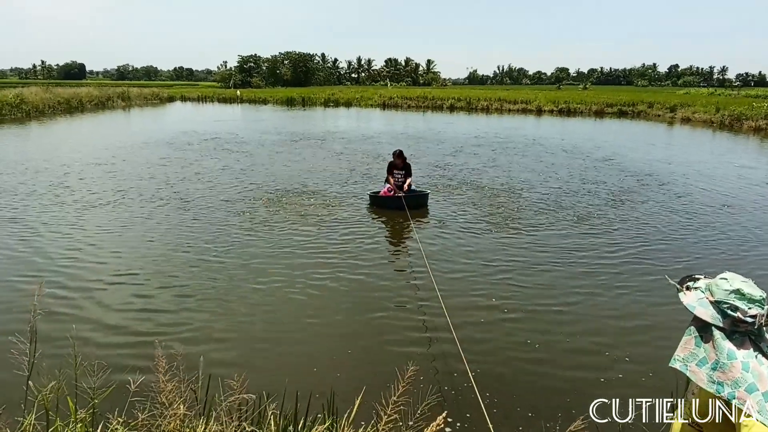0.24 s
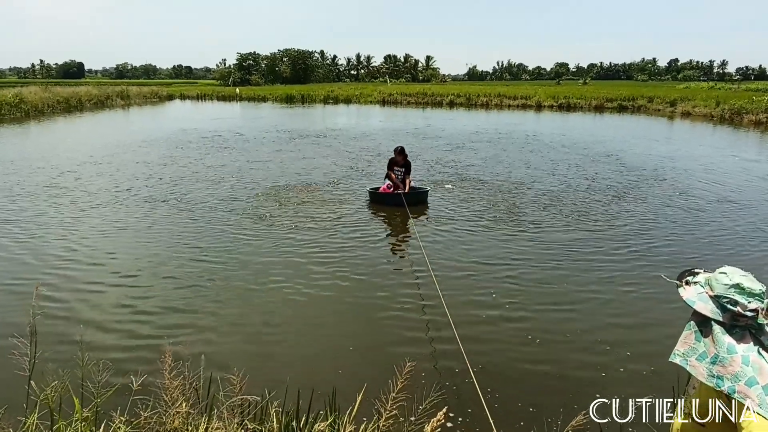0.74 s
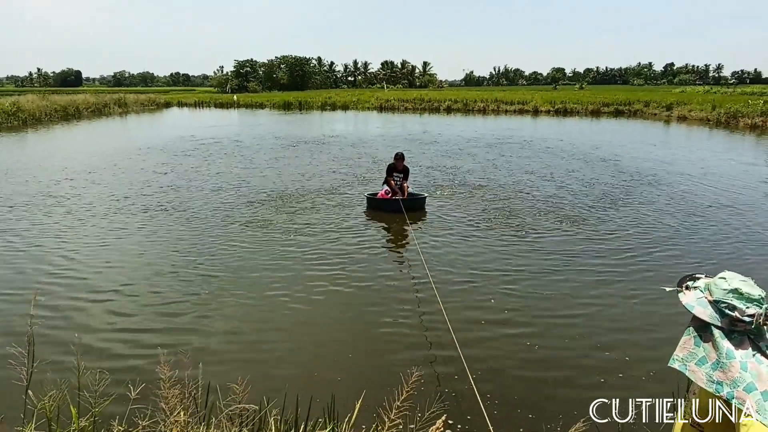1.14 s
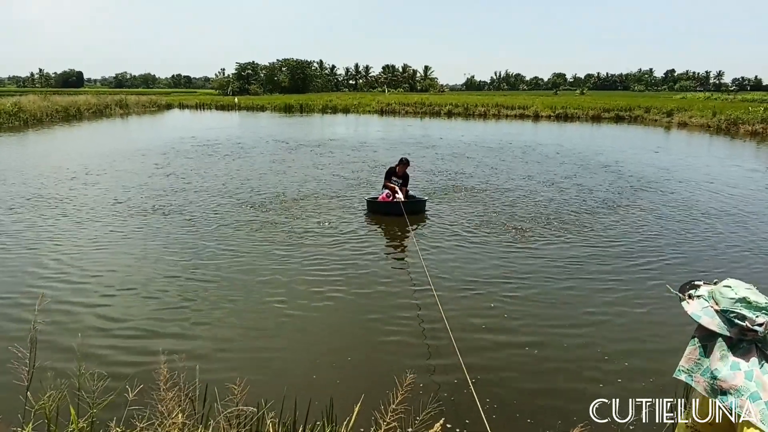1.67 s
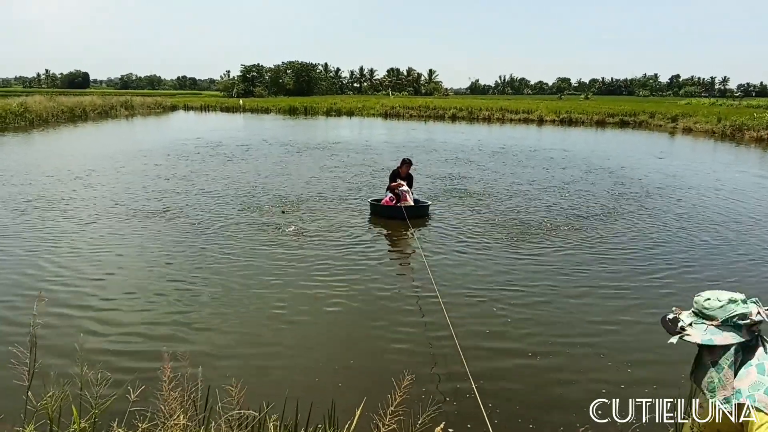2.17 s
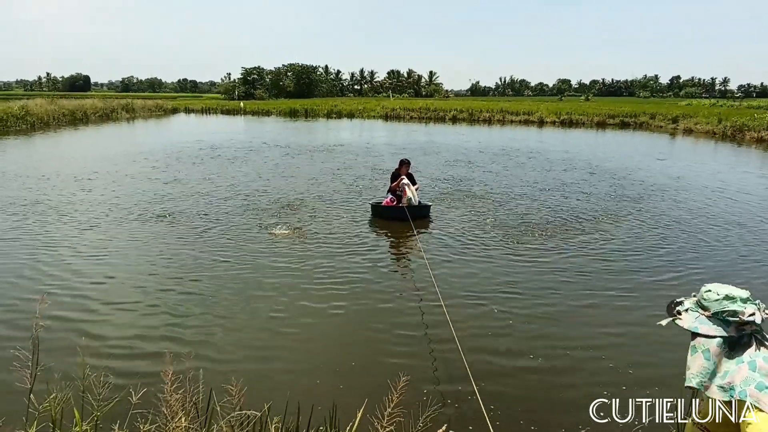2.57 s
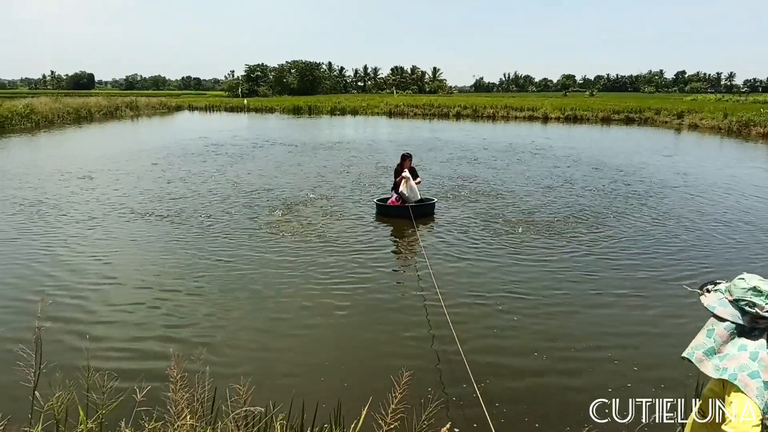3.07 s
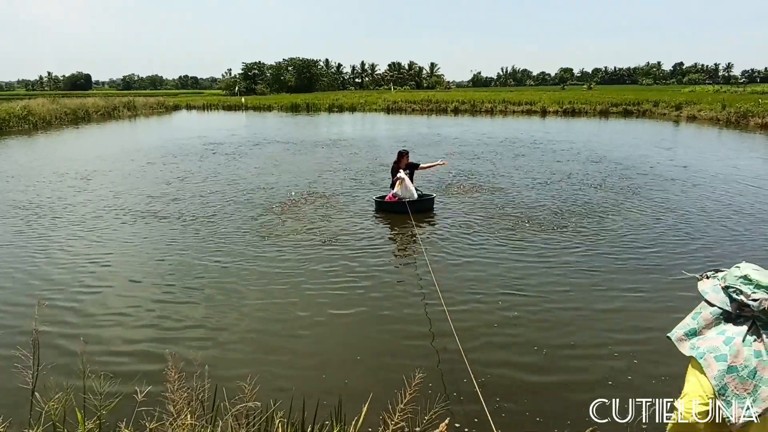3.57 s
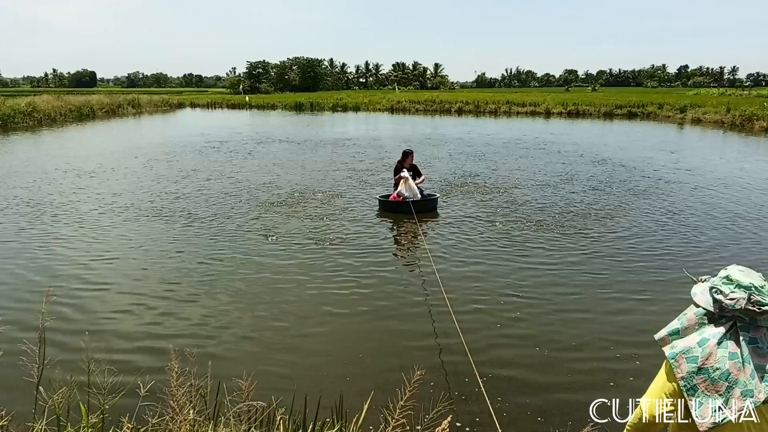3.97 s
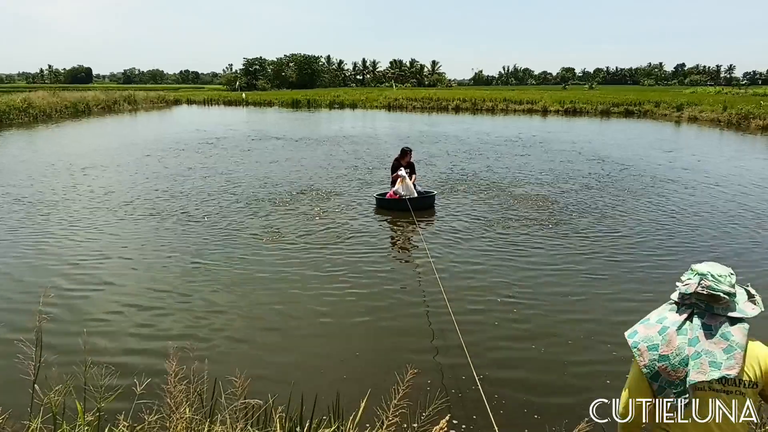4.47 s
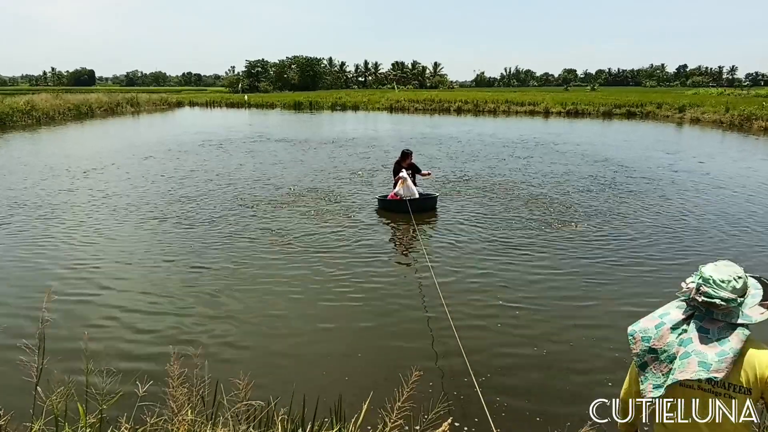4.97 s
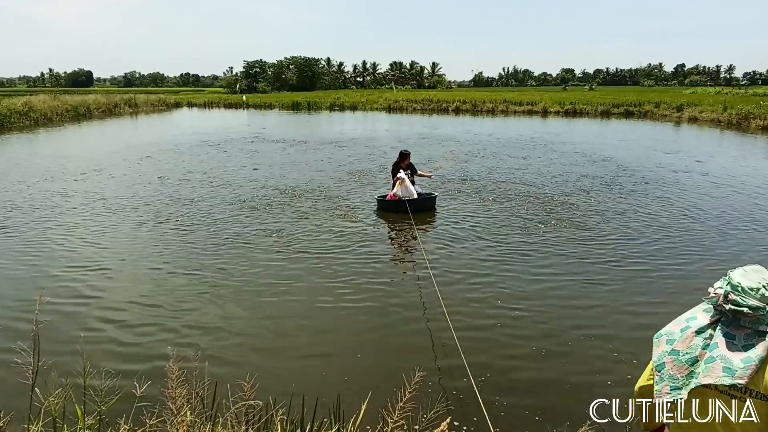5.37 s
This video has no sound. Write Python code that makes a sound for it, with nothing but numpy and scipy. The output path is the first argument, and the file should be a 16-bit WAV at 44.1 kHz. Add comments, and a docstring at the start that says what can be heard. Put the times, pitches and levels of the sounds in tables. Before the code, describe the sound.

Small bubbly plops, ticks and high drop pings scatter across an open pond over a low wash of lapping water. After a sparse first stretch, a single sharp click rings very briefly, close to the microphone. The water then grows livelier, with the strongest plop near two and a half seconds, before easing. Soft cloth- or grass-like hiss and low wind puffs stay faint, with only a slight scattered reflection.

```python
"""A wash of lapping and fine droplets, then plops at mid distance: fish stir a pond while they feed.
Plops are gliding notes of air pockets; ticks are showers of tiny damped sines and noise; lone drops ping.
The wash is coloured noise plus random damped sines. A soft hiss close by (cloth or grass, perhaps) is high noise;
light wind bumps the microphone as low noise, and one small hard object clicks: noise burst plus ringing modes."""
import sys
import numpy as np
from scipy import signal
from scipy.fft import rfft, irfft, next_fast_len
from scipy.io import wavfile
from scipy.ndimage import uniform_filter1d, map_coordinates

SR = 44100
rng = np.random.default_rng(int(sys.argv[2]) if len(sys.argv) > 2 else 0)


def unload_audio(sound):
    """Save the sound as a 16-bit wav file, at the path given as the first command line argument."""
    columns = np.transpose(np.atleast_2d(sound))
    # keep every value between -1 and 1, then stretch to whole-number steps
    steps = np.round(np.clip(columns, -1, 1) * 32767)
    wavfile.write(sys.argv[1], SR, steps.astype(np.int16))


N = 248283

# spectra of the wind, hiss and mist, lapping, spray: [f/Hz, relative density/dB]
WIND_SPECTRUM = [(25, -40), (50, -13), (80, -5.5), (120, -5), (180, -9), (260, -11.5), (400, -35),
                 (700, -120)]
HIGH_SPECTRUM = [(1500, -74), (5000, -6.5), (7000, -13.5), (10000, -15), (12000, -9.5), (13300, 0),
                 (14300, 1), (15400, -5), (17000, -9)]
LAPPING_SPECTRUM = [(71, -58), (120, -20), (355, -6.5), (456, -10), (668, 0.5), (896, -4.5), (1500, -3),
                    (2070, -17), (2360, -19.5), (4000, -25), (5200, -86), (8800, -120)]
SPRAY_SPECTRUM = [(300, -90), (1100, -2), (2000, 11.5), (3000, -1.5), (5000, -0.5), (6500, -1.5),
                  (8000, -10), (11000, -6), (16000, -4.5)]
# tone of the small-bubble grains: [f/Hz, relative gain/dB]
BURBLE_TONE = [(100, -46), (250, -10.5), (450, -8), (700, -4.5), (1600, -4), (2300, -13), (5000, -9.5)]
# wind puffs on the microphone port: [peak t/s, level/dB, rise/s, fall/s]
WIND_PUFFS = [(1.364, -55, 0.026, 0.012), (2.1, -61, 0.11, 0.1), (2.43, -62, 0.032, 0.07),
              (2.56, -61, 0.033, 0.012), (2.886, -51.5, 0.086, 0.021), (3.12, -63, 0.08, 0.035),
              (3.32, -55.5, 0.17, 0.041), (3.59, -61.5, 0.076, 0.054), (3.781, -62, 0.11, 0.037),
              (4.055, -50.5, 0.037, 0.097), (4.22, -63, 0.036, 0.059), (4.45, -53, 0.17, 0.4),
              (4.747, -50.5, 0.062, 0.065), (5.045, -48, 0.033, 0.043), (5.44, -56, 0.023, 0.026)]
# hiss: [t/s, level/dB]
HISS_LEVELS = [(0, -72), (0.21, -62.5), (0.41, -69.5), (0.59, -56.5), (0.69, -65), (1, -64), (1.22, -59),
               (1.77, -60), (2.12, -55), (2.24, -61), (2.4, -60.5), (2.77, -54.5), (2.85, -64), (3.0, -65),
               (3.04, -60), (3.11, -52), (3.18, -56), (3.61, -59.5), (3.7, -64.5), (3.95, -64.5),
               (4.26, -59), (4.35, -69.5), (4.56, -61), (4.76, -73), (4.9, -58.5), (5.01, -71), (5.26, -62),
               (5.42, -68), (5.63, -66)]
# how much the pond is stirred: [t/s, lapping level/dB]
STIR_LEVELS = [(0, -51), (0.42, -53), (0.92, -53), (1.23, -50.5), (1.57, -51), (1.7, -52), (2.01, -48),
               (2.2, -50), (2.6, -47), (2.85, -52), (3.2, -48.5), (3.6, -52), (4, -51), (4.45, -53),
               (5, -51), (5.63, -51.5)]
# surges of water from a fish: [crest t/s, lapping level/dB, spray level/dB, rise/s, fall/s]
SPLASH_SURGES = [(0.25, -54, -62, 0.041, 0.073), (0.79, -50.5, -59, 0.18, 0.072),
                 (2.36, -50, -50.5, 0.042, 0.057), (2.455, -41, -52, 0.043, 0.046),
                 (3.01, -47.5, -64, 0.016, 0.033), (3.30, -49, -58, 0.056, 0.18),
                 (3.48, -57, -59, 0.11, 0.067), (4.08, -46, -62, 0.051, 0.041),
                 (4.27, -53.5, -56.5, 0.061, 0.037), (4.65, -47.5, -64.5, 0.12, 0.053),
                 (5.48, -56, -65, 0.096, 0.031)]
# click of the hard object: [t/s, nominal level/dB]
CLICK_EVENT = (1.959, -12)
# modes of the clicked shell: [f/Hz, relative level/dB, t60/s]
SHELL_MODES = [(257, -13, 0.1), (290, -17, 0.039), (580, -8, 0.016), (1340, -14, 0.01), (1453, -0.5, 0.024),
               (1585, 1.5, 0.029), (2170, -13.5, 0.03), (2740, -16.5, 0.044), (3480, -12, 0.014),
               (4200, -4, 0.0065)]
# single drops that ping: [t/s, level/dB, f/Hz]
LONE_DROPS = [(0.285, -44, 2730), (0.784, -47, 3270), (2.004, -43, 3260), (2.189, -46, 2410),
              (2.456, -39, 3270), (2.47, -46, 5370), (2.559, -49, 2520), (2.726, -41.5, 6820),
              (3.108, -46, 5350), (3.289, -49, 3480), (3.319, -45, 2240), (4.007, -45.5, 2140),
              (4.091, -45, 2760), (4.133, -47, 3020), (4.507, -46.5, 2630), (5.311, -43, 2150),
              (5.484, -45, 5260), (5.513, -40, 2040)]
# droplet ticks: [t/s, nominal lower-part level/dB, nominal top-part level/dB]
DROPLET_TICKS = [(0.0373, -46, -58), (0.051, -38.5, -47), (0.1147, -59, -46), (0.2448, -38.5, -60),
                 (0.2879, -39, -50), (0.309, -45, -56), (0.376, -41.5, -66), (0.458, -44, -54),
                 (0.4935, -40, -63), (0.725, -33.5, -56), (0.734, -45, -60), (0.769, -50, -42),
                 (0.803, -42, -45), (0.875, -55, -45.5), (0.99, -43, -49), (1.053, -48, -44),
                 (1.386, -48, -42), (2.006, -51, -45), (2.112, -39.5, -48), (2.187, -43, -45),
                 (2.2406, -37, -59), (2.284, -38, -61), (2.355, -40, -39), (2.392, -47, -45),
                 (2.447, -31, -53), (2.5483, -37, -59), (2.623, -34.5, -40), (2.702, -56, -39),
                 (2.726, -44, -38.5), (2.771, -38, -35), (2.819, -42, -62), (2.887, -39, -62),
                 (3.006, -37, -58), (3.096, -41, -58), (3.138, -37, -60), (3.18, -47, -58),
                 (3.2146, -45, -60), (3.277, -37, -58), (3.2896, -35, -51), (3.2983, -34.5, -58),
                 (3.337, -44, -43), (3.377, -37, -52), (3.474, -41, -46), (3.8189, -39, -45.5),
                 (3.873, -39, -52), (3.923, -40, -60), (4.046, -44, -52), (4.131, -37.5, -66),
                 (4.2424, -57, -41.5), (4.299, -37.5, -45.5), (4.537, -39.5, -58), (4.634, -40.5, -61.5),
                 (4.668, -38.5, -52), (4.909, -35, -55), (5.022, -37, -64), (5.4672, -40, -62),
                 (5.543, -39, -65)]
# plops of air pockets: [t/s, nominal level/dB, first f/Hz, glide-end f/Hz, nominal length/s]
AIR_POCKETS = [(0.275, -34.5, 1010, 1020, 0.0051), (0.31, -43, 447, 444, 0.015),
               (0.314, -40.5, 1280, 1470, 0.012), (0.56, -34.5, 1830, 1940, 0.0023),
               (0.564, -43.5, 603, 594, 0.025), (0.643, -41.5, 1140, 1140, 0.0082),
               (0.7185, -31, 1320, 1270, 0.0027), (0.734, -33, 1150, 1150, 0.0021),
               (0.784, -23, 1150, 1180, 0.0027), (0.778, -33.5, 813, 738, 0.024),
               (0.799, -25, 760, 740, 0.0038), (0.819, -30.5, 702, 750, 0.0073),
               (0.877, -44, 795, 720, 0.01), (0.993, -33.5, 1420, 1490, 0.0032), (1, -44, 880, 1500, 0.017),
               (1.263, -41, 407, 690, 0.023), (1.343, -31, 1060, 950, 0.003), (1.344, -47, 875, 760, 0.025),
               (1.491, -46.5, 234.6, 598, 0.067), (1.562, -36.5, 623, 666, 0.0082),
               (2.011, -45, 241, 333, 0.016), (2.08, -41.5, 1235, 1250, 0.0056),
               (2.243, -31, 1520, 1560, 0.0044), (2.251, -43.5, 558, 540, 0.01),
               (2.262, -33, 990, 980, 0.0045), (2.264, -34, 1950, 1890, 0.004),
               (2.28, -36, 1910, 1940, 0.0031), (2.31, -42, 590, 630, 0.013),
               (2.366, -37, 636, 606, 0.0054), (2.367, -37.5, 1460, 1310, 0.011),
               (2.381, -37, 1050, 1020, 0.0063), (2.392, -37.5, 790, 765, 0.0073),
               (2.393, -42.5, 332, 318, 0.023), (2.405, -30.5, 580, 623, 0.01),
               (2.44, -36, 637, 640, 0.011), (2.458, -33, 1580, 1590, 0.0073),
               (2.452, -20.5, 1020, 1000, 0.0036), (2.468, -39, 616, 636, 0.013),
               (2.547, -37.5, 635, 620, 0.0049), (2.55, -43.5, 287, 320, 0.021),
               (2.766, -47.5, 287, 634, 0.05), (2.808, -32, 680, 840, 0.012),
               (2.823, -30, 617, 655, 0.0054), (2.876, -31, 946, 983, 0.0018),
               (2.878, -40, 515, 777, 0.011), (2.917, -39.5, 1350, 1340, 0.004),
               (3.006, -36, 1410, 1340, 0.0033), (3.007, -35.5, 2080, 2170, 0.0044),
               (3.008, -35, 900, 825, 0.006), (3.079, -46.5, 692, 656, 0.039),
               (3.106, -36, 622, 635, 0.0081), (3.153, -34.5, 730, 695, 0.0083),
               (3.183, -29, 657, 610, 0.0044), (3.249, -34, 710, 660, 0.015), (3.26, -34, 550, 563, 0.02),
               (3.276, -31, 710, 710, 0.0041), (3.296, -37, 794, 734, 0.012), (3.37, -41, 515, 466, 0.0092),
               (3.434, -38, 1380, 1400, 0.0066), (3.457, -38.5, 687, 897, 0.0186),
               (3.458, -36.5, 1530, 1510, 0.0035), (3.471, -35.5, 1480, 1430, 0.006),
               (3.506, -38.5, 1350, 1435, 0.0065), (3.61, -43, 656, 730, 0.02),
               (3.726, -37.5, 970, 940, 0.0092), (3.753, -40.5, 559, 956, 0.036),
               (3.88, -45.5, 644, 680, 0.014), (4.024, -40, 1310, 1540, 0.0067),
               (4.046, -28.5, 1070, 1060, 0.0036), (4.053, -32.5, 258, 198, 0.0053),
               (4.06, -41, 810, 770, 0.007), (4.108, -34, 1530, 1510, 0.0044), (4.11, -47, 556, 535, 0.011),
               (4.132, -32, 2040, 2090, 0.0017), (4.254, -41, 675, 615, 0.025),
               (4.301, -30, 1320, 1390, 0.0043), (4.31, -32, 880, 763, 0.0056),
               (4.606, -33.5, 1000, 980, 0.006), (4.708, -44, 768, 764, 0.027),
               (4.778, -37.5, 362, 325, 0.0062), (4.803, -42.5, 566, 1240, 0.039),
               (4.919, -27.5, 860, 760, 0.0036), (5.008, -45, 880, 900, 0.007),
               (5.073, -43.5, 1080, 1540, 0.011), (5.018, -43, 378, 229, 0.0216),
               (5.126, -50, 544, 700, 0.042), (5.187, -52.5, 544, 635, 0.029),
               (5.243, -47.5, 287, 752, 0.048), (5.41, -34, 570, 730, 0.0078),
               (5.501, -35.5, 833, 860, 0.0067), (5.517, -37.5, 940, 970, 0.007),
               (5.546, -38, 474, 522, 0.0099)]
# decay of the scattered answer: [f/Hz, t60/s]
BANK_DECAY = [(200, 0.3), (2000, 0.08), (10000, 0.056)]

BREEZE_DB = -77.5  # between the puffs
CALM_DB, CALM_SPRAY_DB = -51, -64  # spray level when the lapping is at CALM_DB
SPRAY_DB_PER_STIR_DB = 1.68
GRAIN_SURGE_POWER = 0.23  # growth of grains with the surge
DROP_ATTACK_S, DROP_T60_S = 0.00038, 0.02
TICK_T60_S = 0.017
SNAP_REL_DB, SNAP_HZ, SNAP_DECAY_S = -3.5, 1700, 0.00023  # the flick that opens a tick
GLIDE_TIME_POWER = 1.823  # slow at first, then quick
GLIDE_SWELL_POWER = 0.17  # a rising note swells with its pitch
ATTACK_SHARE_PER_OCTAVE = 0.16  # share of length added to the attack of a rising note
HOLD_PER_CYCLE = 0.04  # long notes hold their level and stop more abruptly
BAND_LIMIT_HZ = 15600


def amp(db):
    """dB to linear gain."""
    return 10 ** (np.asarray(db) / 20)


def unit(x):
    """x at rms 1."""
    return x / np.sqrt(np.mean(x ** 2) + 1e-20)


def along(points, hz):
    """Interpolate [Hz, value] points on a log axis."""
    f, v = np.transpose(points)
    return np.interp(np.log(hz + 1), np.log(f + 1), v)


def curve(rows):
    """One value per sample from [s, value] rows."""
    s, values = np.transpose(rows)
    return np.interp(np.arange(N) / SR, s, values)


def wobble(knots_hz):
    """Smooth random curve through knots_hz knots a second."""
    knots = rng.standard_normal(int(N * knots_hz / SR) + 4)
    return map_coordinates(knots, [np.arange(N) * knots_hz / SR])


def swell(s, rise_s, fall_s):
    """Bell-shaped gain, peak 1 at s, with its own width on each side."""
    t = np.arange(N) / SR - s
    return np.exp(-np.abs(t / np.where(t < 0, rise_s, fall_s)) ** 1.55)


def add_at(out, s, x):
    """Add x to out from time s, in place."""
    out[round(s * SR):][:len(x)] += x


def filtered(x, response):
    """x times a response of frequency."""
    m = next_fast_len(N + SR // 2)
    return irfft(rfft(x, m) * response(np.fft.rfftfreq(m, 1 / SR)), m)[..., :N]


def coloured(x, spectrum):
    """x given a spectrum, at the gain that keeps white noise at its rms."""
    def gain(hz):
        g = amp(along(spectrum, hz))
        return g / np.sqrt(np.mean(g ** 2))
    return filtered(x, gain)


def rush(patchy_db):
    """White noise of rms 1 with time-frequency patches of random gain."""
    z = signal.stft(rng.standard_normal(N), nperseg=256)[2]
    field = uniform_filter1d(rng.standard_normal(z.shape), 4, axis=0)
    field = uniform_filter1d(field, 6, axis=1)
    return unit(signal.istft(z * amp(patchy_db * unit(field)), nperseg=256)[1][:N])


def grains(count, hz, octaves, cycles, rise, spread_db, size):
    """Damped sines at random times, each with its own pitch, life and strength; rms 1."""
    u, g = rng.random((count, 2)), rng.standard_normal((count, 2))
    t = np.arange(size) / SR
    pitch_hz = np.clip(hz * 2 ** (octaves * g[:, :1]), 100, SR / 2.5)
    age = t * pitch_hz / (cycles * np.exp(.5 * g[:, 1:]))  # in lives of the grain
    wave = np.sin(2 * np.pi * pitch_hz * t * (1 + rise * age))
    wave *= np.exp(-age) * (1 - np.exp(-3.5 * age))
    wave *= np.hanning(2 * size)[size:]  # fade to zero at the grain's end
    wave *= amp(-spread_db * np.log(u[:, :1] + 0.018))  # a few grains are much stronger
    at = (u[:, 1:] * N).astype(int) + np.arange(size)
    return unit(np.bincount(at.ravel(), wave.ravel(), N + size)[:N])


def wind():
    """Eddies bump the microphone port in lumps, puff by puff: low noise under swelling gains."""
    level = amp(BREEZE_DB)
    for s, db, rise_s, fall_s in WIND_PUFFS:
        level = level + amp(db) * swell(s, rise_s, fall_s)
    rumble = coloured(rush(patchy_db=-0.5), WIND_SPECTRUM)
    return level * unit(amp(3.4 * wobble(35)) * rumble)


def hiss():
    """High, slightly gritty noise that swells and fades."""
    grit = grains(count=5000, hz=12300, octaves=0.68, cycles=1.0, rise=0, spread_db=5.0, size=32)
    level = amp(curve(HISS_LEVELS) + 1.1 * wobble(50))
    return level * coloured(rush(patchy_db=2.5) + 0.52 * grit, HIGH_SPECTRUM)


def water():
    """Many small bubbles merge into lapping under crackling droplets; splashes lift grains more than wash."""
    stir_db = curve(STIR_LEVELS)
    calm_lap = amp(stir_db)
    calm_fine = amp(CALM_SPRAY_DB + SPRAY_DB_PER_STIR_DB * (stir_db - CALM_DB))
    lap, fine = calm_lap, calm_fine
    for s, lap_db, fine_db, rise_s, fall_s in SPLASH_SURGES:
        surge = swell(s, rise_s, fall_s)
        lap = np.hypot(lap, amp(lap_db) * surge)
        fine = np.hypot(fine, amp(fine_db) * surge)

    burble = grains(count=2000, hz=945.6, octaves=0.812, cycles=5.73, rise=0.069, spread_db=1.5, size=900)
    burble = unit(coloured(burble, BURBLE_TONE))
    more_burble = (lap / calm_lap) ** GRAIN_SURGE_POWER
    lapping = 0.72 * coloured(rush(patchy_db=2.0), LAPPING_SPECTRUM) + 0.66 * more_burble * burble

    fizz = grains(count=2200, hz=3715, octaves=0.644, cycles=13.0, rise=0.018, spread_db=2.0, size=128)
    drips = grains(count=900, hz=2600, octaves=0.642, cycles=10.4, rise=0.033, spread_db=3.5, size=500)
    more = (fine / calm_fine) ** GRAIN_SURGE_POWER
    spray = coloured(rush(patchy_db=1.0) / more + 0.5 * more * fizz, SPRAY_SPECTRUM)
    spray += 0.32 * more * drips

    jostle = wobble(25.01)  # shared by lapping and spray
    lap_gain = lap * amp(0.31 * jostle)
    spray_gain = fine * amp(2.9 * jostle + 2.9 * wobble(60))
    return lap_gain * lapping + spray_gain * spray


def click():
    """A snap cracks as a noise burst and rings the modes of a small hard shell."""
    s, db = CLICK_EVENT
    out, t = np.zeros(N), np.arange(SR // 5) / SR
    ring = np.zeros(len(t))
    for hz, mode_db, t60_s in SHELL_MODES:
        build_up = 1 - np.exp(-(t * hz / 1.15) ** 2)  # over a cycle or two
        ring += amp(mode_db - 60 * t / t60_s) * np.sin(2 * np.pi * hz * t) * build_up
    crack = 0.26 * amp(-60 * t / 0.0059) + 0.054 * amp(-60 * t / 0.15)
    add_at(out, s, amp(db) * crack * rng.standard_normal(len(t)))
    out = 0.74 * coloured(out, HIGH_SPECTRUM) + 1.3 * coloured(out, SPRAY_SPECTRUM)
    add_at(out, s + .0011, amp(db) * ring)  # the shell answers just after the crack
    return filtered(out, lambda hz: (1j * hz / (90 + 1j * hz)) ** 2)  # too small to radiate bass


def pings():
    """A lone drop traps a tiny bubble that rings one short high note."""
    out, t = np.zeros(N + SR), np.arange(SR // 20) / SR
    shape = (1 - np.exp(-(t / DROP_ATTACK_S) ** 2)) * amp(-60 * t / DROP_T60_S)
    shape /= shape.max()
    for s, db, hz in LONE_DROPS:
        add_at(out, s, amp(db) * shape * np.sin(2 * np.pi * hz * t))
    return out[:N]


def ticks():
    """Droplets and tail flicks break the surface: one snap, then a short shower of tiny ringing drops."""
    (low, high, snaps), t = np.zeros((3, N + SR)), np.arange(SR // 8) / SR
    flick = np.sin(2 * np.pi * SNAP_HZ * t) * np.exp(-t / SNAP_DECAY_S)
    tail = amp(-60 * t / TICK_T60_S)
    shower = (1 - np.exp(-t / 0.00033)) * (tail + 0.75 * amp(-60 * t / 0.0027))
    puff = 1.56 * (1 - np.exp(-t / 0.0012)) * tail  # the finest mist builds more slowly
    for s, low_db, high_db in DROPLET_TICKS:
        add_at(low, s, amp(low_db) * shower)
        add_at(high, s, amp(high_db) * puff)
        add_at(snaps, s, amp(low_db + SNAP_REL_DB) * flick)
    drops = grains(count=16000, hz=2170, octaves=0.714, cycles=2.2, rise=0.013, spread_db=2.0, size=200)
    mist = rng.standard_normal((2, N))
    low_part = low[:N] * (0.68 * drops + 0.18 * coloured(mist[0], SPRAY_SPECTRUM))
    top_part = high[:N] * coloured(mist[1], HIGH_SPECTRUM)
    return snaps[:N] + low_part + top_part


def bubbles():
    """Each air pocket sings one gliding note: quick start, short hold, fading end."""
    out = np.zeros(N + SR)
    for s, db, first_hz, last_hz, length_s in AIR_POCKETS:
        t = np.arange(round(3 * length_s * SR) + 200) / SR
        glide = np.minimum(t / length_s, 1.3) ** GLIDE_TIME_POWER
        hz = first_hz * (last_hz / first_hz) ** glide
        rise_oct = max(np.log2(last_hz / first_hz), 0)

        attack_s = 0.69 / first_hz + (0.065 + ATTACK_SHARE_PER_OCTAVE * rise_oct) * length_s
        shape = 1 - np.exp(-t / attack_s)
        shape *= (hz / first_hz) ** (GLIDE_SWELL_POWER * rise_oct)
        end_power = 2.0 + rise_oct + HOLD_PER_CYCLE * length_s * first_hz
        shape *= np.exp(-(t / (0.00029 + 1.134 * length_s)) ** end_power)

        # the pocket's wall shivers, less on rising notes
        flutter_hz = 90 * 2 ** rng.uniform(-0.58, 0.53)
        flutter_db = 3.4 / (1 + 6 * rise_oct) * np.sin(2 * np.pi * (flutter_hz * t + rng.random()))
        note = np.sin(2 * np.pi * np.cumsum(hz) / SR)
        add_at(out, s, amp(db) * shape * amp(flutter_db) * note)
    return out[:N]


def banks(x):
    """Scattered answer of the water and the banks; each frequency dies at its own speed."""
    hz, t, z = signal.stft(rng.standard_normal(SR // 4), SR, nperseg=256)
    decay = amp(-60 * t / along(BANK_DECAY, hz)[:, None])
    tail = signal.istft(z * decay, SR, nperseg=256)[1]
    return signal.fftconvolve(x, tail / np.linalg.norm(tail))[:N]


def scene():
    """Sum of all sources; only plops, ticks, pings and click feed the banks."""
    splashes = bubbles() + ticks() + pings()
    snap = click()
    answer = banks(amp(-11.0) * splashes + amp(-11.5) * snap)
    return (wind() + hiss() + water() + snap + splashes + answer)[None]


def record(dry):
    """The microphone is weak in the deep bass; nothing passes above the band limit."""
    return filtered(dry, lambda hz: (1j * hz / (60 + 1j * hz)) ** 2 * (hz < BAND_LIMIT_HZ))


dry = scene()
out = record(dry)
unload_audio(out)
```